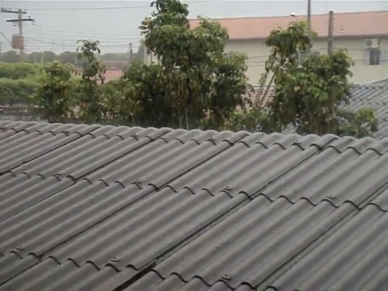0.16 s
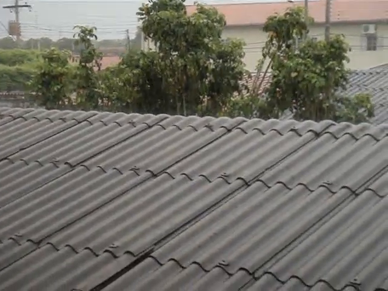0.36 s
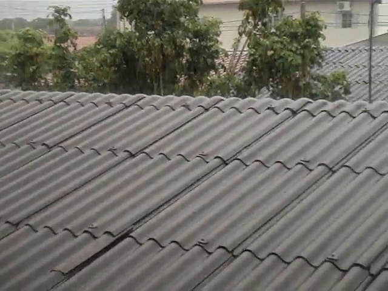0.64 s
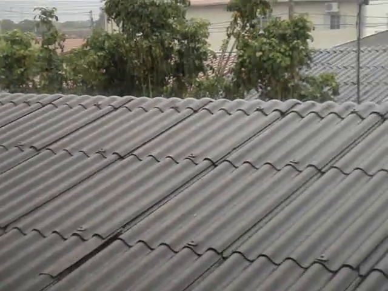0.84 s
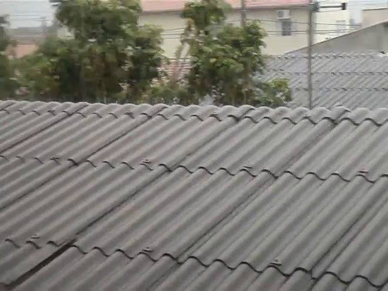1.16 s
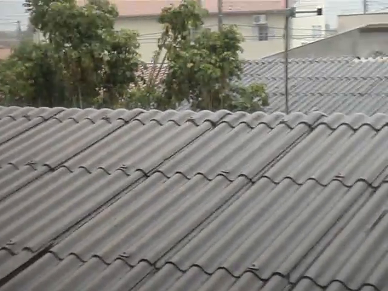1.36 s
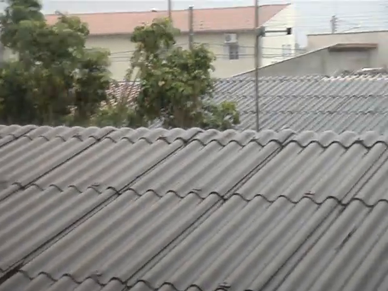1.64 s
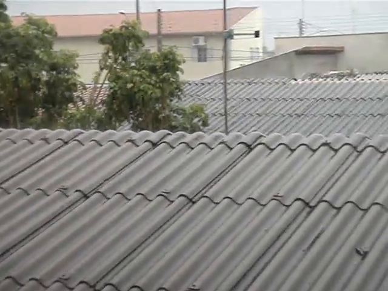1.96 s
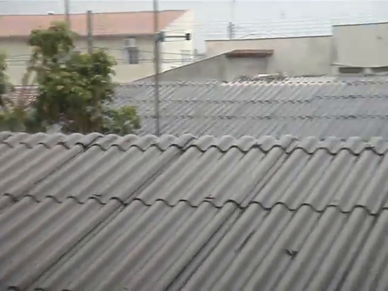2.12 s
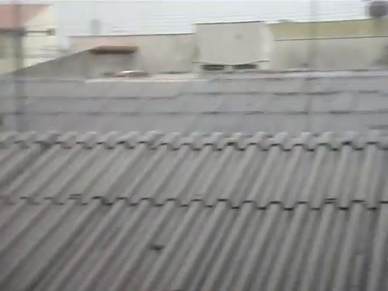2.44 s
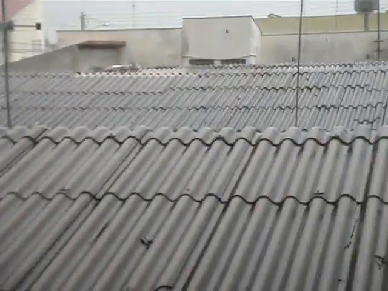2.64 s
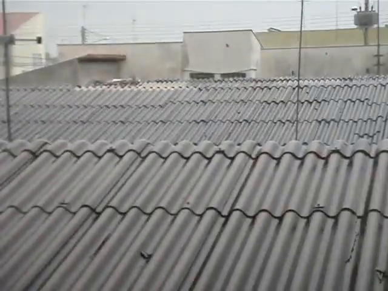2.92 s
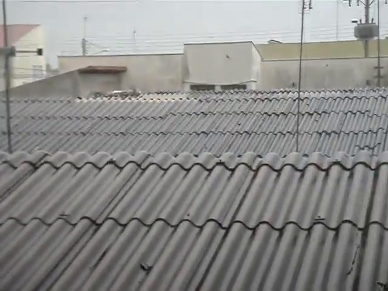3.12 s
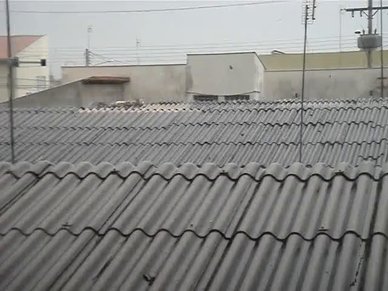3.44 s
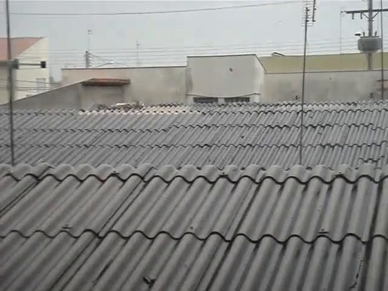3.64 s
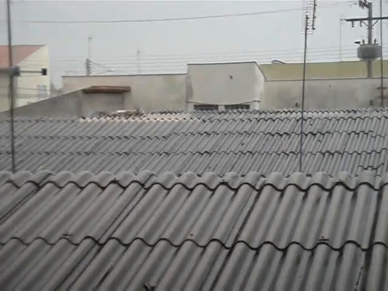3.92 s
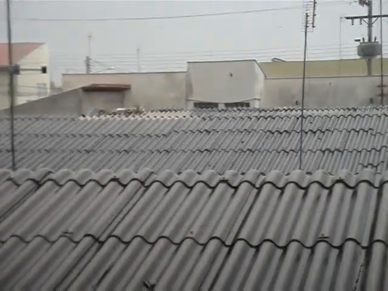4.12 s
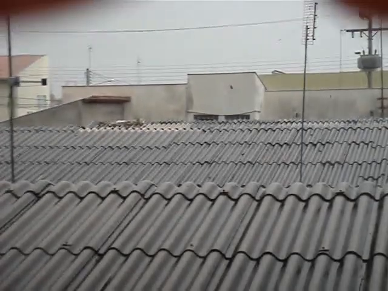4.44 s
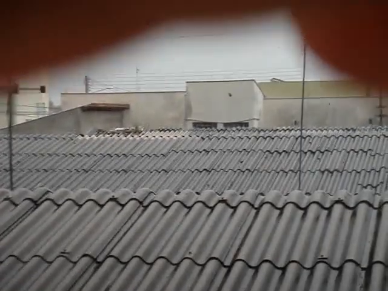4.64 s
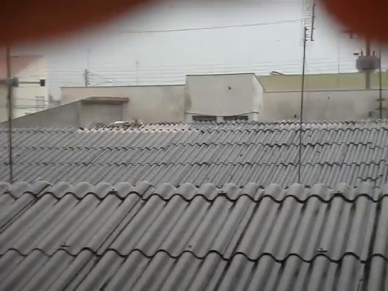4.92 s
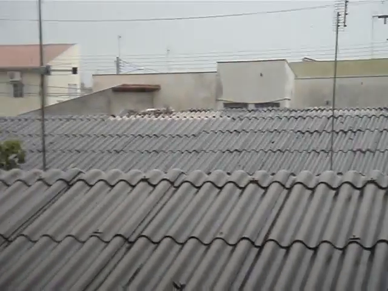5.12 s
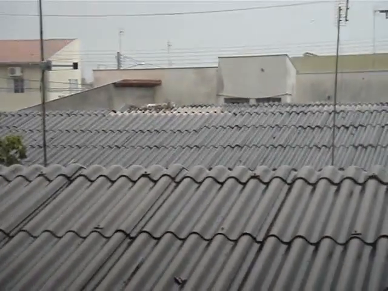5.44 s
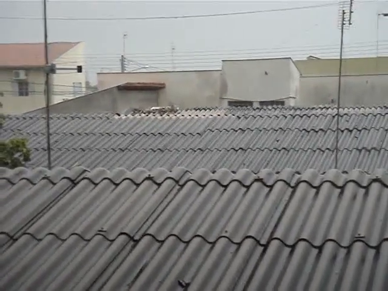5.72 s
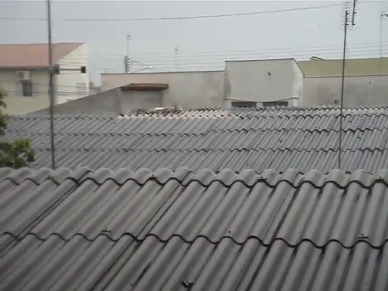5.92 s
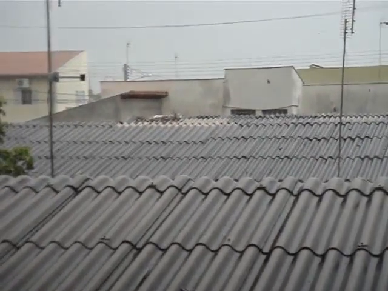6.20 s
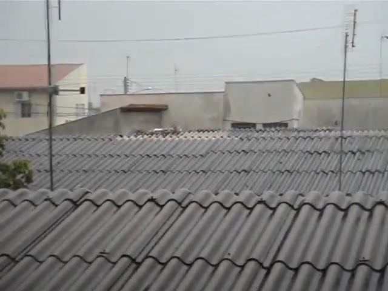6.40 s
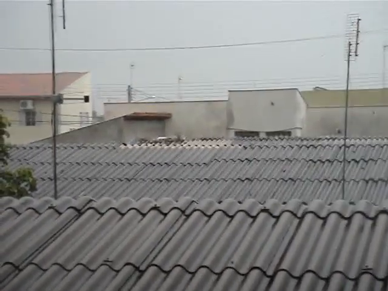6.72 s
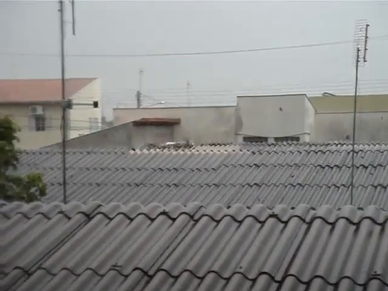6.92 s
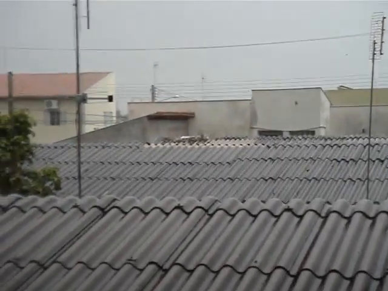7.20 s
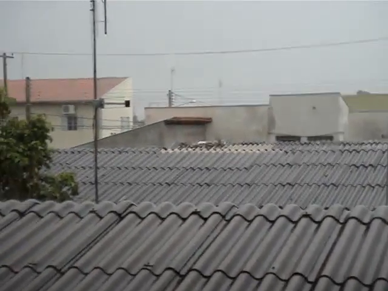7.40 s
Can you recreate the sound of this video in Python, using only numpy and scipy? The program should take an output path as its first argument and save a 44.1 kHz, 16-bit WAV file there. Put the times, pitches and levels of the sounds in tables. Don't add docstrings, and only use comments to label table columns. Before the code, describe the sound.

Rain patters densely on a corrugated roof, muffled then open and hissing, with close drops smacking near the microphone and occasional handling thumps.

```python
import sys
import numpy as np
from scipy import signal
from scipy.fft import rfft, irfft, next_fast_len
from scipy.io import wavfile
from scipy.ndimage import uniform_filter1d, minimum_filter1d, map_coordinates

SR = 44100
rng = np.random.default_rng(int(sys.argv[2]) if len(sys.argv) > 2 else 0)


def materialize(psi):
    bounded = np.clip(np.atleast_2d(psi).T, -1, 1)
    quanta = np.round(bounded * 32767).astype(np.int16)
    wavfile.write(sys.argv[1], SR, quanta)


def nominal_scale(level):
    x = np.asarray(level, float) / 20
    return 10 ** x


N = 333396


def unit(x):
    return x / np.sqrt(np.mean(x ** 2) + 1e-20)


def curves(rows):
    s, *columns = np.transpose(rows)
    return [np.interp(np.arange(N) / SR, s, column) for column in columns]


def filtered(x, response):
    size = next_fast_len(N + 8192)
    gain = response(np.fft.rfftfreq(size, 1 / SR))
    return irfft(rfft(x, size) * gain, size)[..., :N]


def coloured(x, spectrum):
    points = [(1, -120)] + list(spectrum) + [(SR / 2, -120)]
    f, db = np.transpose(points)
    return unit(filtered(x, lambda hz: nominal_scale(np.interp(np.log(hz + 1), np.log(f + 1), db))))


def wobble(rate):
    points = rng.standard_normal(int(N * rate / SR) + 4)
    return map_coordinates(points, [np.arange(N) * rate / SR])


def add(track, s, sound):
    part = track[round(s * SR):][:len(sound)]
    part += sound[:len(part)]


def opening(s, clears_s, over_s):
    return (1 + np.tanh((s - clears_s) / over_s)) / 2


# pitch_hz, level_db (per Hz)
RUMBLE_TONE = [(12, -33), (25, -13.5), (45, -19), (64, -10), (86, -16), (128, -6), (175, -8), (250, -4.5),
               (330, -32.5)]
# start_s, level_db
WIND_STRENGTH = [(0.0, -39), (0.17, -40.5), (1.89, -40), (2.63, -41.5), (5.16, -40), (6.36, -43.5),
                 (6.89, -40.5), (7.24, -40), (7.56, -42.5)]


def rumble():
    strength_db = curves(WIND_STRENGTH)[0] - 0.75 + 1.0 * wobble(5.1)
    return nominal_scale(strength_db) * coloured(rng.standard_normal(N), RUMBLE_TONE)


# start_s, peak_db
BIAS_JUMPS = [(1.363, -33), (1.559, -27), (2.537, -38.5), (4.002, -43), (4.026, -25.5), (4.986, -22),
              (5.128, -28), (5.49, -36), (5.562, -26), (5.6, -37), (5.908, -34), (5.92, -31), (6.031, -39),
              (6.049, -26.5), (6.12, -32), (6.2, -30), (6.32, -33), (6.431, -33), (6.65, -37),
              (6.809, -36.5), (7.07, -37), (7.161, -28.5), (7.35, -37.5), (7.515, -30.5)]


def bias():
    out, t = np.zeros(N), np.arange(SR // 5) / SR
    jump = (1 - np.exp(-t / .0015)) * np.exp(-t / .011)
    jump -= .1 * (1 - np.exp(-t / .02)) * np.exp(-t / .05)
    for s, db in BIAS_JUMPS:
        add(out, s, nominal_scale(db + 3) * jump)
    return out


# start_s, peak_db, pitch_hz, direction (-1 or 1), fall_by_60_db_s
FINGER_KNOCKS = [
    (1.3648, -11.5, 314, -1, 0.018),
    (1.371, -12, 1000, 1, 0.0057),
    (1.5596, -12.5, 600, -1, 0.008),
    (2.004, -44, 65, -1, 0.86),
    (2.01, -30, 162, -1, 0.19),
    (2.018, -9, 690, 1, 0.0046),
    (2.2303, -12.5, 296, -1, 0.016),
    (4.9849, -10.5, 493, -1, 0.0037),
    (6.745, -14.5, 353, 1, .007),
]


def knocks():
    out, t = np.zeros(N), np.arange(SR // 2) / SR
    for s, db, hz, sign, t60 in FINGER_KNOCKS:
        ring = sign * nominal_scale(db + 7.0 - 60 * t / t60) * np.sin(2 * np.pi * hz * t)
        thin_shell = signal.butter(1, 0.18 * hz, "high", fs=SR)
        add(out, s, signal.lfilter(*thin_shell, ring))
    return out


# start_s, pitch_hz, extra_level_db
CLOSE_DROPS = [
    (1.371, 2900, .5),
    (4.584, 3300, 2.5),
    (5.8536, 3900, 2),
    (6.0488, 3500, 0),
    (6.1997, 3700, 1),
    (6.2301, 3300, 2.5),
    (7.3681, 2900, 1),
]


def smacks():
    out, lead = np.zeros(N), .002
    t = np.arange(SR // 200) / SR - lead
    for s, hz, over_db in CLOSE_DROPS:
        cycle = np.sin(2 * np.pi * hz * t) * np.exp(-(t * hz / .42) ** 2)
        add(out, s - lead, nominal_scale(6 + over_db) * cycle)
    return out


def strays(count):
    when, size, pitch = rng.random((count, 3)).T
    s = .01 + when * (N / SR - .02)
    db = -16.5 - 3 * np.log(0.42 + size) + 7.5 * opening(s, 3.3, .3)
    hz = 5280 * 2 ** (0.27 * (3 * pitch - 2))
    return list(zip(s, db, hz))


# start_s, peak_db, pitch_hz
NEAR_DROPS = [(0.4714, -7, 6100), (0.6027, -8, 5340), (0.7238, -5.5, 7310), (0.9857, -8, 4590),
              (1.581, -6.5, 5000), (1.5852, -6.5, 4500), (1.5957, -4.5, 5560), (2.5604, -7, 3480),
              (1.8753, -5.5, 4960), (2.6573, -6, 3490), (3.8638, -.3, 3100), (3.9657, -1.2, 2850),
              (4.0057, -4.5, 8050), (4.05, -.5, 4870), (4.11, -.5, 4210), (4.294, -.5, 6240),
              (5.0545, -1.2, 4730), (5.1283, .5, 4700), (5.4908, .3, 3500), (5.5795, .3, 3220),
              (5.908, .3, 3580), (6.1088, .2, 2590), (6.1956, .5, 4300), (6.3173, -3.2, 6970),
              (6.4318, -1.5, 3430), (6.6531, -.5, 3130), (6.811, -2.5, 3820), (7.1587, -2.5, 4540),
              (7.1694, -1.5, 2380)]


def splats():
    out, lead = np.zeros(N), .002
    t = np.arange(SR // 30) / SR - lead
    for s, db, hz in NEAR_DROPS + strays(count=65):
        decay_s = .002 * np.exp(0.43 * rng.standard_normal())
        tick = np.sin(2 * np.pi * hz * t) * np.exp(-(t * hz / 0.96) ** 2)
        band = signal.butter(2, [0.54 * hz, min(1.35 * hz, 12000)], "band", fs=SR)
        splash = unit(signal.lfilter(*band, rng.standard_normal(len(t))))
        fall = np.exp(-np.abs(t) / np.where(t < 0, .0004, decay_s))
        add(out, s - lead, nominal_scale(db) * (0.8 * tick + 0.26 * splash * fall))
    return out


def bursts(count, spread_db, decay):
    when, size = rng.random((count, 2)).T
    kick_power = nominal_scale(-2 * spread_db * np.log(0.065 + size))
    kicks = np.bincount((when * (N - 1)).astype(int), kick_power, N)
    t = np.arange(SR // 20) / SR
    power = np.abs(signal.fftconvolve(kicks, np.exp(-t / decay))[:N])
    return power / uniform_filter1d(power, size=6000)


# start_s, level_db
SHOWER_SWELL = [(0, 0.3), (.5, -0.3), (1, -0.16), (1.5, .1), (2, -.3), (2.5, -0.06), (3, -0.8),
                (3.5, -0.75), (4, -0.2), (4.5, .3), (5, 0), (5.4, 1.1), (5.8, 0.4), (6.1, 0.2),
                (6.45, -1.6), (6.85, 1.5), (7.2, 0.1), (7.56, 0.5)]
# middle_s, level_db, half_length_s
GUSTS = [(0.617, 1, .012), (0.958, 1.5, 0.047), (1.48, -1.3, .02), (1.594, 1.5, 0.017), (2.566, 0, 0.017),
         (2.598, -2, 0.014), (2.651, 1.5, 0.022), (2.873, 0, 0.025), (3.12, 1, 0.045), (3.482, 1.5, 0.009),
         (5.073, 0.5, 0.047), (5.152, -1, .03), (5.22, -1.5, 0.012), (5.399, 0, .015), (5.468, 3, 0.0087),
         (5.597, 3.5, .015), (5.667, -1, 0.086), (6.095, 1, .03), (6.4, 0.5, 0.056), (6.63, -4.5, .012),
         (6.695, 1.5, 0.0093), (6.729, -3.5, 0.017), (7.052, -3.5, 0.0064), (7.075, 4, 0.008),
         (7.104, -1, .015), (7.238, 4.5, 0.014), (7.249, -3, 0.031), (7.287, 2.5, 0.018),
         (7.319, -1.5, 0.012), (7.45, 0, 0.033)]
# behind_frame_db, in_open_db, clears_frame_s, clearing_time_s, shadow_db,
# follows_shower (dB per dB)
RAIN_LAYERS = [
    (-23, -22, 3.0, 0.16, 0.5, 1.17),
    (-27, -20.5, 3.29, 0.15, 4, 0.82),
    (-25.5, -17.5, 3.66, 0.56, -4, 1.25),
    (-30, -28, 3.9, 0.27, 2.6, 1.05),
]


def levels():
    s = np.arange(N) / SR
    coarse = s[::44]
    gust_db = sum(db * np.exp(-((coarse - at) / half) ** 2) for at, db, half in GUSTS)
    fall_db = curves(SHOWER_SWELL)[0] + np.interp(s, coarse, gust_db)
    shadow = np.exp(-((s - 3.18) / .22) ** 2)
    out = []
    for hid_db, open_db, clears_s, over_s, shade_db, follows in RAIN_LAYERS:
        view_db = hid_db + (open_db - hid_db) * opening(s, clears_s, over_s)
        out.append(view_db + shade_db * shadow + follows * fall_db + 0.59 * wobble(7))
    return out


# pitch_hz, level_db (per Hz)
DRUM_TONE = [(150, -51), (260, -8), (420, -3), (540, -1.5), (700, -1), (860, 1), (1050, 0), (1300, -1.5),
             (1650, -7.5), (2300, -36.5)]
PATTER_TONE = [(900, -42.5), (1350, -4.5), (1600, -1), (2100, 0.5), (2700, -0.5), (3600, -12)]
HISS_TONE = [(2000, -28.5), (2900, -1.5), (3500, -1.5), (4300, -2), (5300, -1.5), (6200, -4.5), (8000, -36)]
SPRAY_TONE = [(4600, -53.5), (6000, -2.5), (6800, 2.5), (8000, -3), (9200, -6.5), (10100, -13.5),
              (13000, -39)]


def rain():
    spatter = bursts(count=1100, spread_db=0.5, decay=0.0027)
    ticks = bursts(count=1500, spread_db=9.5, decay=0.00031)
    shares = [(0.14, 0.043, 0.043), (0.22, 0.028, 0.014), (0.32, 0.061, 0.16), (0.24, 0.11, 0.24)]
    tones = [DRUM_TONE, PATTER_TONE, HISS_TONE, SPRAY_TONE]
    out = np.zeros(N)
    for db, tone, (near, sharp, own) in zip(levels(), tones, shares):
        own_drops = bursts(count=900, spread_db=0.0, decay=0.0014)
        wash = 1 - near - sharp - own
        power = wash + near * spatter + sharp * ticks + own * own_drops
        sheet = coloured(np.sqrt(power) * rng.standard_normal(N), tone)
        out += nominal_scale(db + 0.42 * wobble(25)) * sheet
    return out / (1 + np.abs(out / .85) ** 4) ** .25


def scene():
    shift = bias()
    duck_db = -70 * np.maximum(shift, 0)
    air = rumble() + smacks() + splats() + rain() * nominal_scale(duck_db)
    return (air + knocks() + shift)[None]


# middle_s, half_length_s, up_to_hz
TREBLE_GAPS = [
    (3.36, .008, 9500),
    (3.81, .012, 6500),
    (5.11, .012, 6100),
    (6.795, .008, 6500),
    (7.056, .015, 7500),
]


def starved(x, margin_db, depth_db, from_hz, whim_db):
    hz, s, z = signal.stft(x, SR, nperseg=256)
    power = uniform_filter1d(np.abs(z[:126]) ** 2, size=3, axis=1) + 1e-14
    band = power.reshape(42, 3, -1).mean(axis=1)
    band_hz = hz[:126:3, None]
    nearby = -minimum_filter1d(-uniform_filter1d(band, size=3, axis=0), size=11, axis=1)
    whim = rng.standard_normal((42, band.shape[1] // 3 + 1))
    whim = np.repeat(whim, 3, axis=1)[:, :band.shape[1]]
    whim = (whim + np.roll(whim, 1, axis=0) + .5 * whim[:1]) / 1.5
    slack_db = .6 * np.maximum(band_hz - from_hz, 0) / 1000
    gap_db = 9 * sum((np.abs(s - at) < half) & (band_hz < top_hz) for at, half, top_hz in TREBLE_GAPS)
    empty = band < nearby * nominal_scale(2 * (whim_db * whim + gap_db - margin_db - slack_db))
    empty = np.repeat(empty, 3, axis=0) & (hz[:126, None] > from_hz)
    z[:126] *= np.where(empty, nominal_scale(depth_db), 1)
    return signal.istft(z, SR, nperseg=256)[1][:N]


def roll_off(x):
    return signal.sosfilt(signal.butter(12, 10200, fs=SR, output="sos"), x)


def record(dry):
    x = dry[0] / (1 + np.abs(dry[0] / 1.12) ** 6) ** (1 / 6)
    x = starved(x, margin_db=6.5, depth_db=-28, from_hz=5100, whim_db=3.5)
    x = filtered(x, lambda hz: hz < 10120)
    mix = np.clip(x, -1, 1)[None]
    return roll_off(mix)


dry = scene()
out = record(dry)
materialize(out)
```